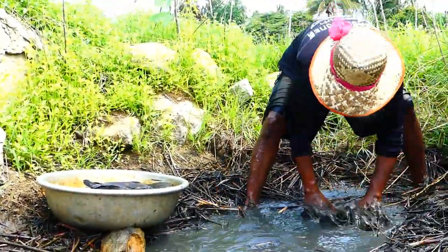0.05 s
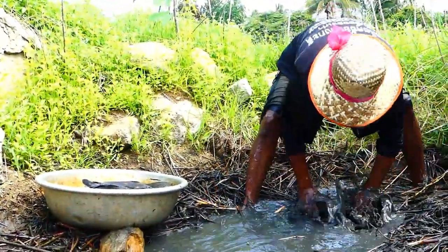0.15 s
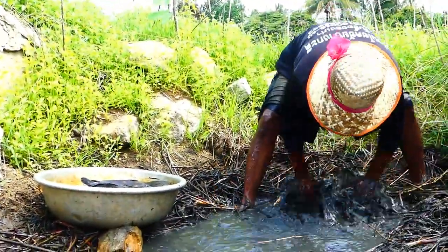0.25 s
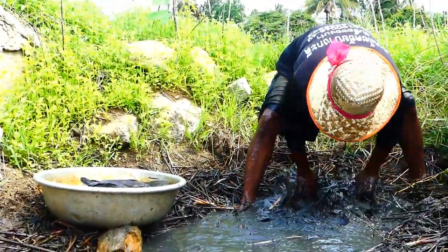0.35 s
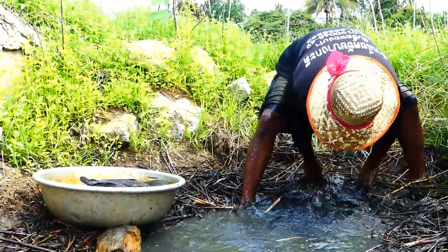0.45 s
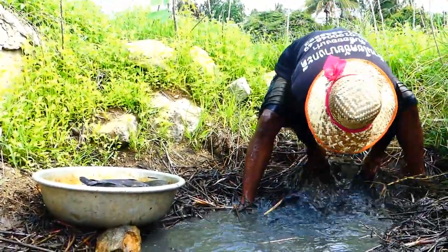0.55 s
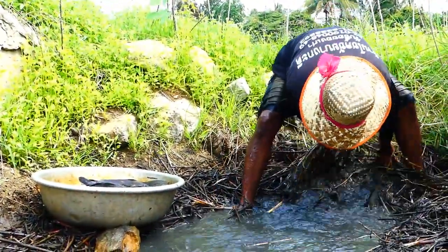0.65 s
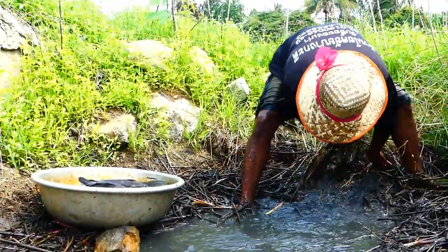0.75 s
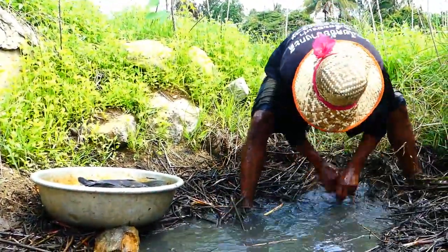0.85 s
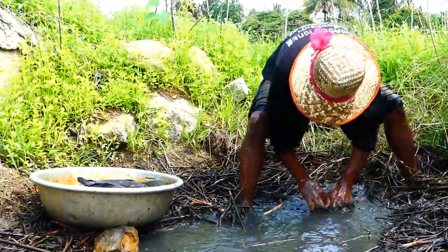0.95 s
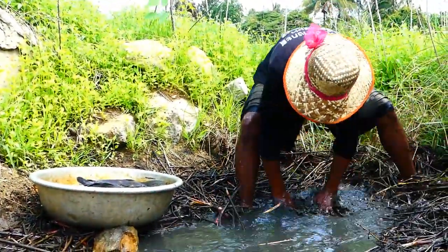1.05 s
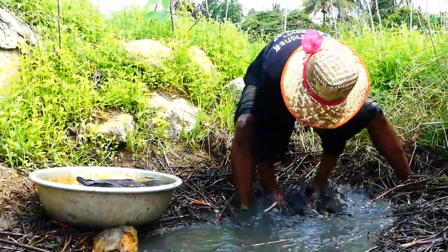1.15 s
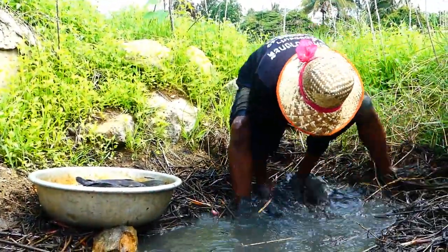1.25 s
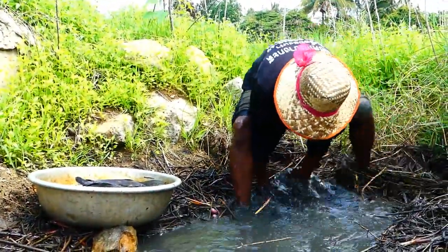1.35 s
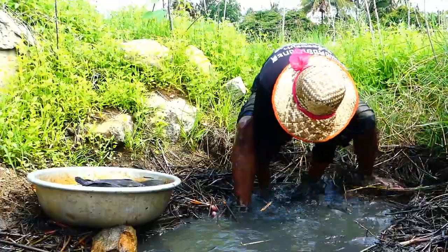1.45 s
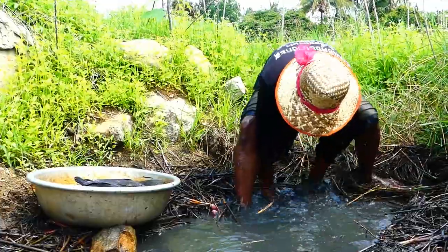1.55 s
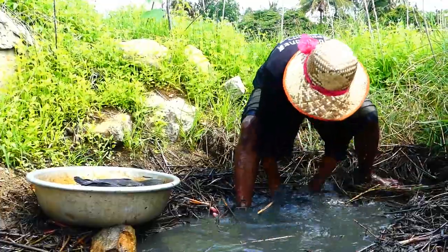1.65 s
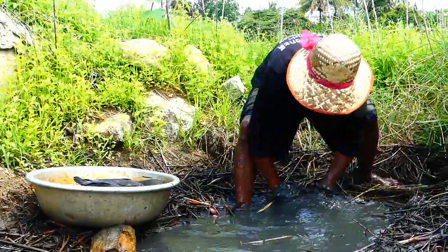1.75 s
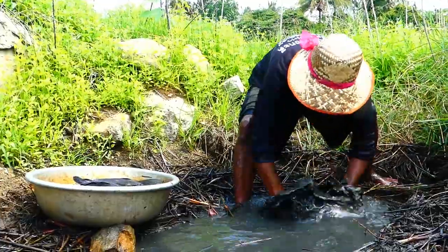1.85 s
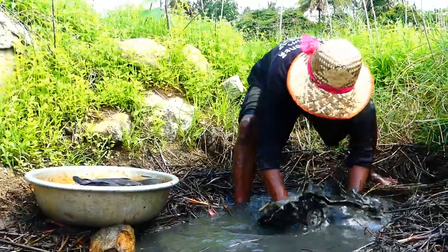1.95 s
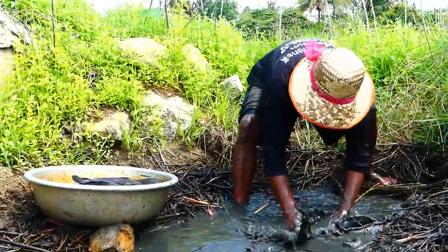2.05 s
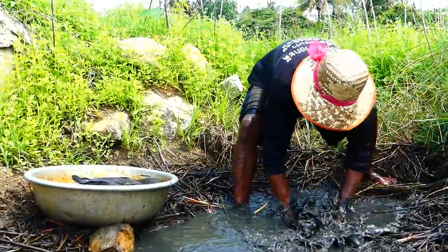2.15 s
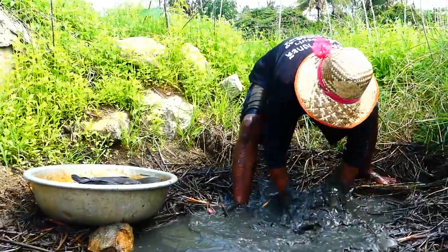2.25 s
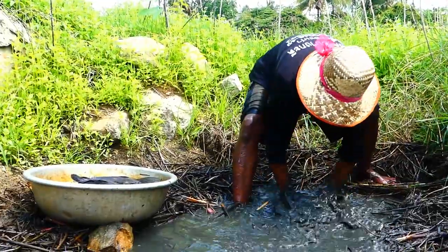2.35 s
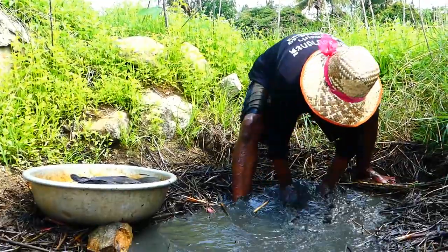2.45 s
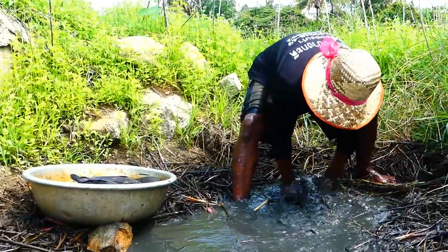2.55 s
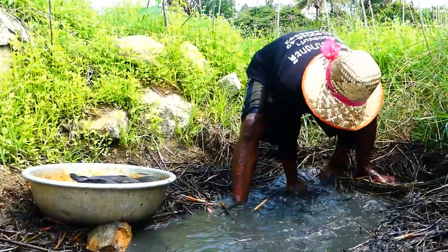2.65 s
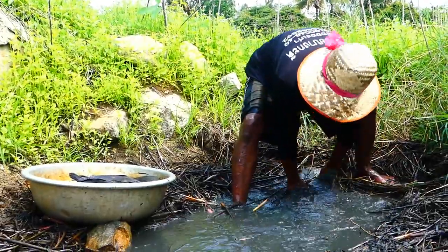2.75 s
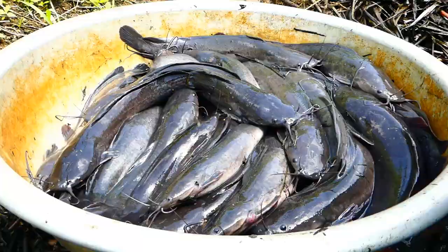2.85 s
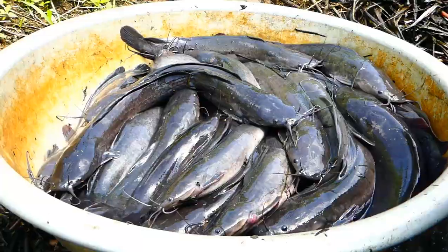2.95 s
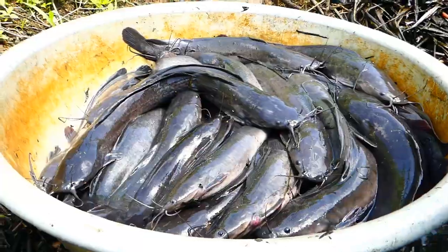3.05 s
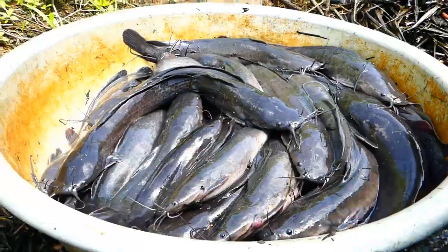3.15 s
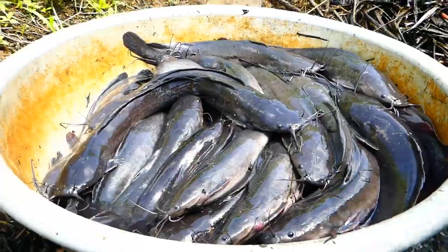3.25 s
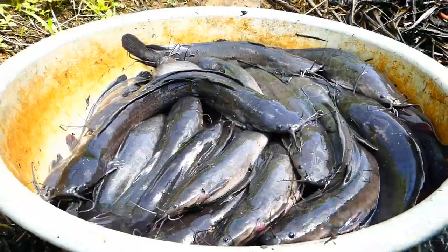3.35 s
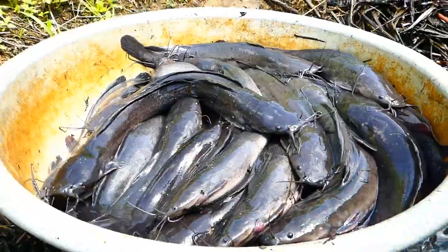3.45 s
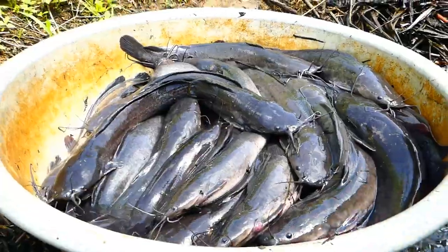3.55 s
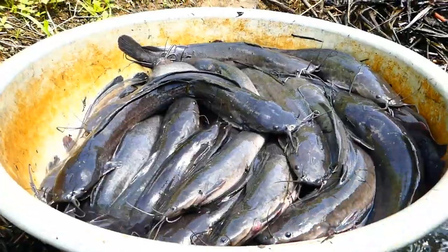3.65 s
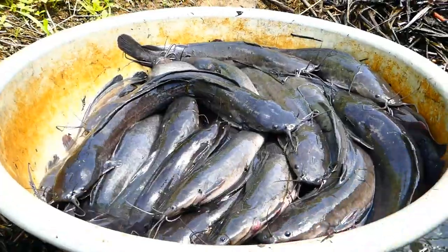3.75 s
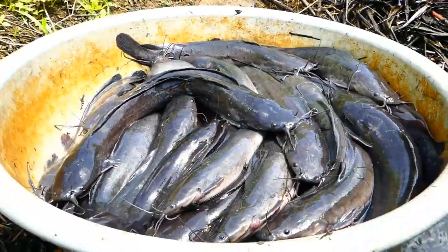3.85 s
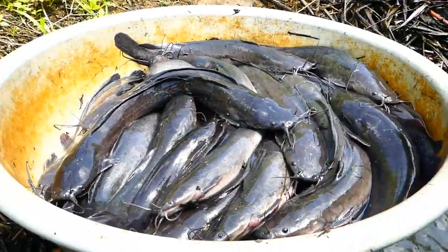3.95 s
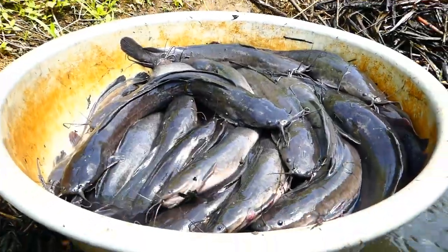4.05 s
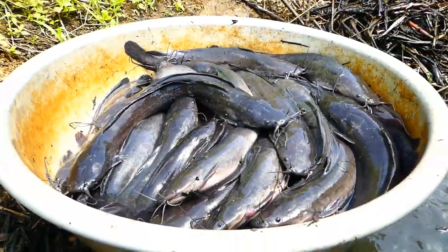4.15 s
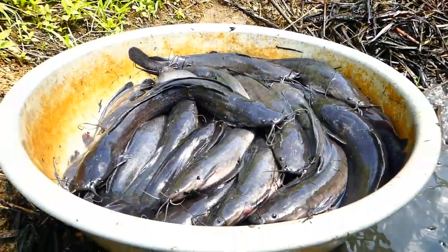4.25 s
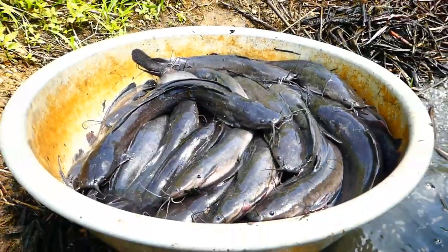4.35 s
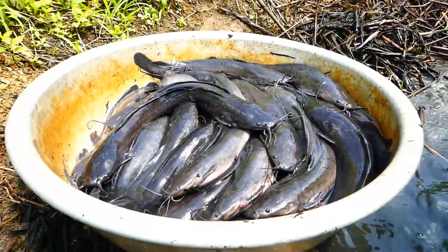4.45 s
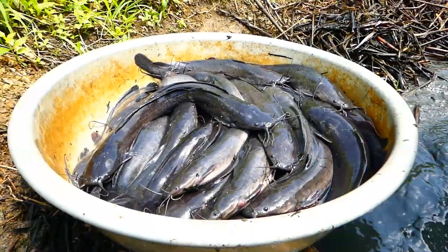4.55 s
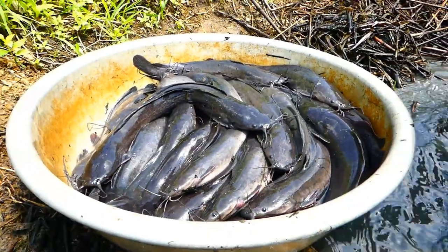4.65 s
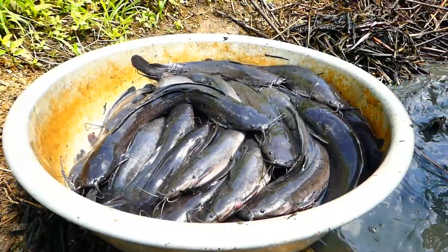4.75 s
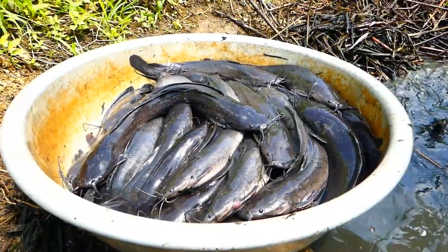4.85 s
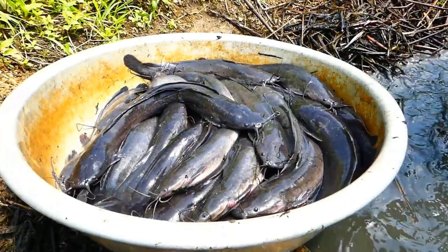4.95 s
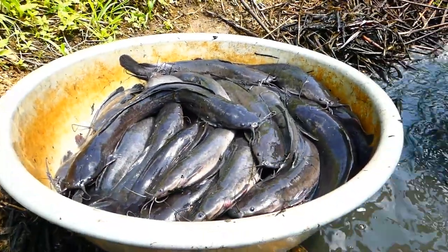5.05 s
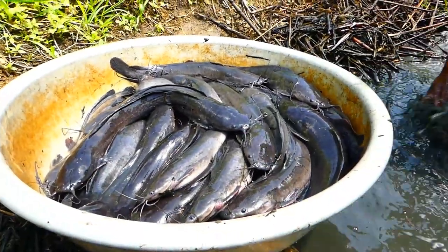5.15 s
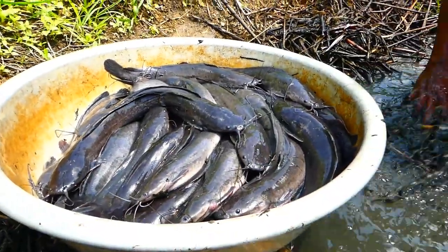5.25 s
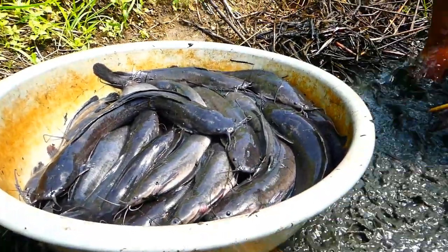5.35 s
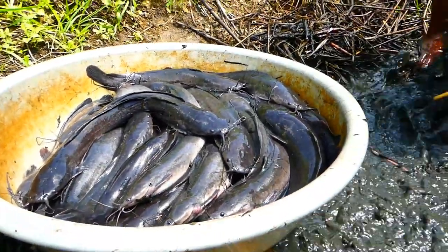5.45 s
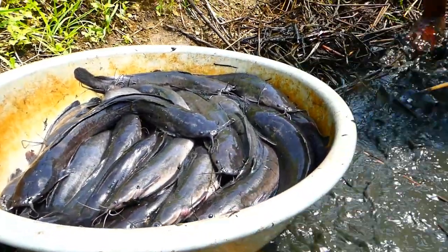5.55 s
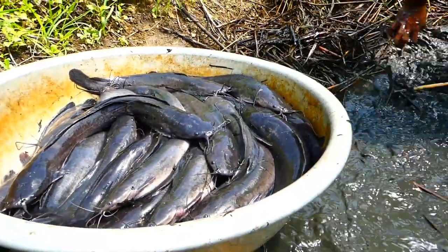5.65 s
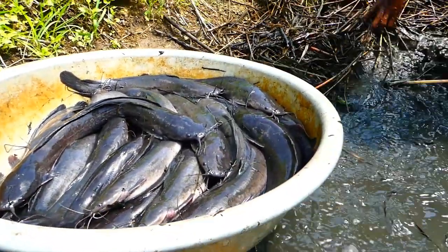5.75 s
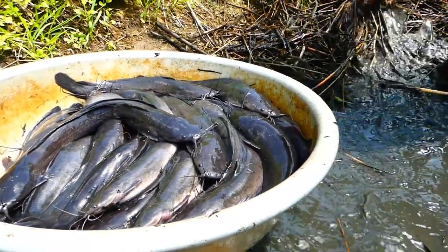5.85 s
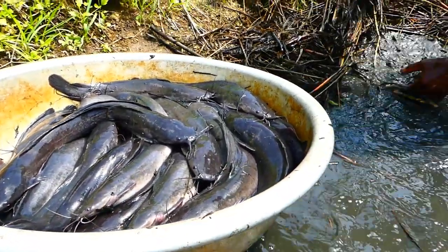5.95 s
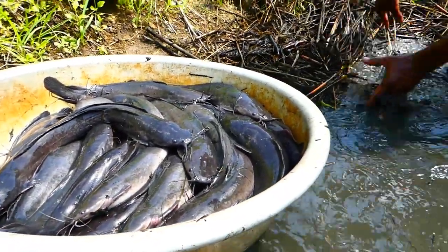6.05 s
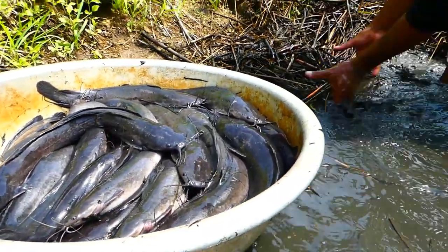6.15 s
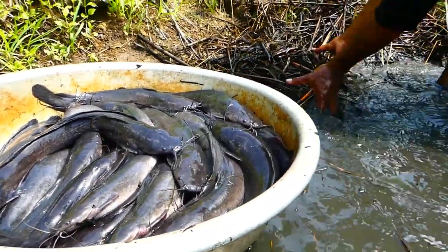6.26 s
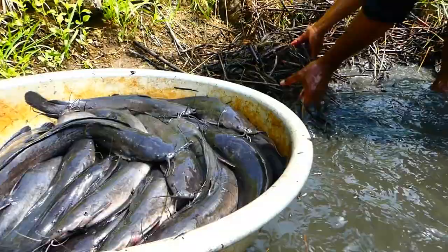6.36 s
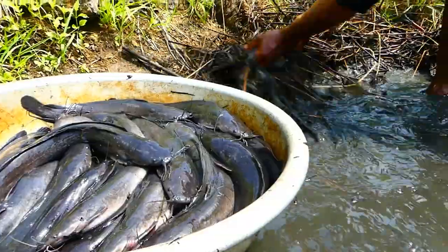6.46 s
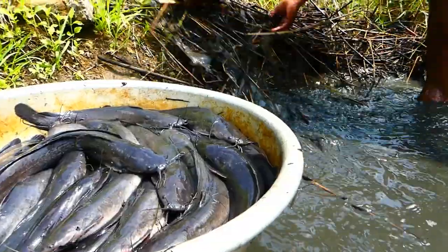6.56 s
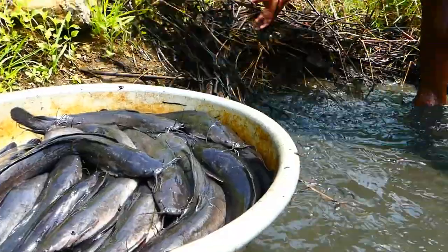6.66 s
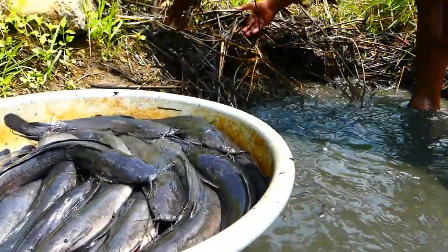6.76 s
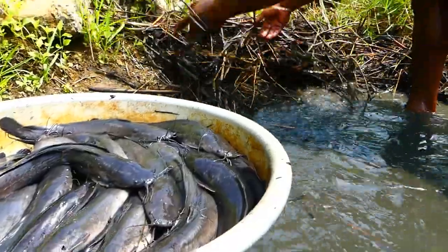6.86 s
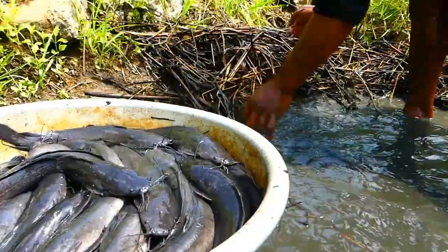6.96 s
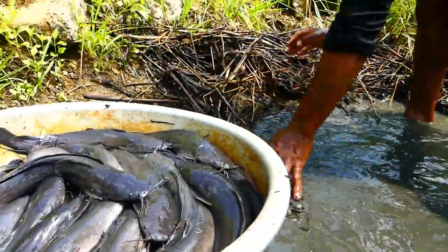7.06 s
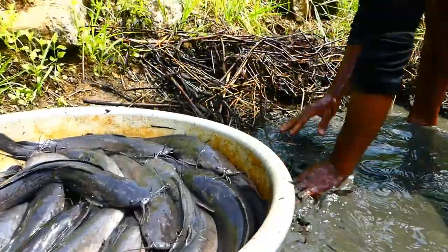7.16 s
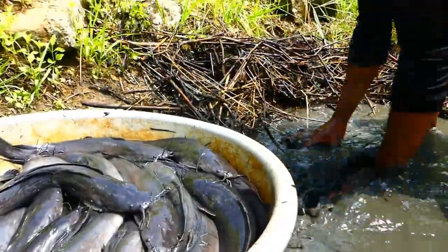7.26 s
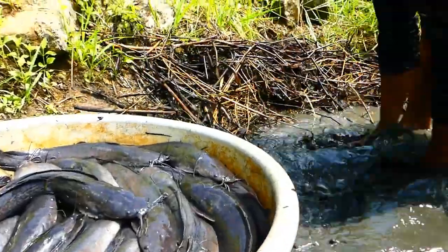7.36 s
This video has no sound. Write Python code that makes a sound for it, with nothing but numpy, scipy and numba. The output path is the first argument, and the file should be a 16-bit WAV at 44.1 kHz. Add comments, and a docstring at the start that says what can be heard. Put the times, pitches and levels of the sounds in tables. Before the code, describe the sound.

Hands dig and sweep through shallow muddy water outdoors in uneven sloshing rushes, with plops, spatter, twig snaps and one brief silent gap.

```python
"""Muddy water laps faintly, then hands dig and sweep through a shallow pond outdoors, in uneven rushes.
Torn water traps air in cavities of every size, each a sine that rings and dies; filtered noise is the froth.
Clods slap back in as clusters of cavities, drops spatter and plink, and twigs snap as damped bright tones.
The sound cuts out for a moment and fades back in from a second spot, with the water more to the right."""
import sys
import numpy as np
from scipy import signal
from scipy.fft import rfft, irfft, next_fast_len
from scipy.io import wavfile
from scipy.ndimage import uniform_filter1d
from numba import njit

SR = 44100
rng = np.random.default_rng(int(sys.argv[2]) if len(sys.argv) > 2 else 0)


def transcribe(signal):
    """Save signal, clipped to [-1, 1], as a 16-bit WAV file at the path in sys.argv[1]."""
    frames = np.atleast_2d(signal).T
    limited = np.clip(frames, -1, 1)
    pcm = np.round(limited * 32767).astype(np.int16)
    wavfile.write(sys.argv[1], SR, pcm)


N = 325899
TIME = np.arange(N) / SR   # seconds

# when the sound cuts out, returns, loses its smooth wash and is fully back
CUT_S, RESUME_S, SMOOTH_UNTIL_S, FADED_IN_S = 2.937, 3.188, 3.35, 3.6
CUTOFF_HZ = 15600
SWARM_RISE = 0.13   # share by which the pitch of most bubbles climbs as they ring


def from_db(db):
    """Decibels to gain."""
    return 10 ** (np.asarray(db) / 20)


def rms_one(x):
    """Scale to unit power."""
    return x / np.sqrt(np.mean(x ** 2) + 1e-20)


def in_time(rows):
    """Each column of a curve, sample by sample."""
    s, *columns = np.transpose(rows)
    return [np.interp(TIME, s, column) for column in columns]


def coloured(x, points):
    """Filter by a spectrum of (Hz, dB) points."""
    size = next_fast_len(N + 4096)
    hz, db = np.transpose(points)
    bins_hz = np.maximum(np.arange(size // 2 + 1) * SR / size, 1)
    gain = from_db(np.interp(np.log(bins_hz), np.log(hz), db))
    return irfft(rfft(x, size) * gain, size)[..., :N]


def band(x, low_hz, high_hz, order=2):
    """Butterworth band-pass."""
    edges_hz = [low_hz, min(high_hz, .45 * SR)]
    return signal.sosfilt(signal.butter(order, edges_hz, "band", fs=SR, output="sos"), x + 1e-18)


def add(track, s, sound):
    """Mix a sound into a track at time s."""
    at = max(round(s * SR), 0)
    track[at:at + len(sound)] += sound[:N - at]


@njit
def bubbles(starts, hz, heights, t60, rise, swell):
    """Each bubble is a sine that builds up over `swell` cycles, climbs in pitch and is choked by the mud."""
    out = np.zeros(N)
    for k in range(len(starts)):
        at, length, cycle = int(starts[k] * SR), int(t60[k] * SR) + 2, 0.
        for i in range(min(length, N - at)):
            age = i / length
            cycle += hz[k] / SR * (1 + rise * age)
            envelope = (1 - np.exp(-cycle / swell)) * np.exp(-np.log(1000) * age) * (1 - age * age)
            out[at + i] += heights[k] * envelope * np.sin(2 * np.pi * cycle)
    return out


# Colour of the open air. Each row: pitch in Hz, strength in dB per Hz.
AIR_COLOUR = [(25, -18.5), (90, -16.5), (250, -7.5), (1000, -17), (5000, -23), (15000, -26)]


def breeze():
    """Quiet open air is coloured noise, with one soft puff of wind on the microphone."""
    air = from_db(-46.5) * rms_one(coloured(rng.standard_normal((2, N)), AIR_COLOUR))
    puff = from_db(-41.5) * rms_one(band(rng.standard_normal((2, N)), 53, 176))
    puff_shape = np.exp(-((TIME - 2.905) / 0.034) ** 2)
    fade = np.interp(TIME, [CUT_S, RESUME_S, FADED_IN_S], [1, .2, 1]) ** 2
    return puff * puff_shape + air * fade


ATTACK_S, SAG_DB_PER_S, RELEASE_DB_PER_S = 0.03, 3, 266   # a sweep bites, tires and falls away
WASH_DB, WASH_DB_PER_S = -14.5, 64.5   # thrown water keeps trickling back after it


def sweep(start_s, length_s):
    """Power of one movement: a quick attack, a sagging hold, a release and a faint wash."""
    age = np.maximum(TIME - start_s, 0)
    after = np.maximum(age - length_s, 0)
    held = np.minimum(age / ATTACK_S, 1) * from_db(-SAG_DB_PER_S * age)
    wash = from_db(WASH_DB)
    release = (1 - wash) * from_db(-RELEASE_DB_PER_S * after)
    trickle = wash * from_db(-WASH_DB_PER_S * after)
    return (held * (release + trickle)) ** 2


# Water lapping between the sweeps. Each row: time in seconds, level in dB.
LAPPING_CURVE = [(0, -38), (0.04, -50.5), (0.14, -55.5), (0.85, -44.5), (1, -38), (1.07, -42),
                 (1.65, -42.5), (1.81, -41.5), (2.85, -40.5), (2.94, -56.5), (3.2, -78.5), (3.3, -56),
                 (3.5, -43.5), (4.05, -42), (5.2, -36.5), (6.4, -41), (6.83, -39.5), (6.92, -45.5),
                 (7.1, -49), (7.18, -43), (7.225, -52.5), (7.28, -43)]
LAP_BRIGHT_DB, LAP_DEPTH_DB = 5.5, -16.5   # brightness, and big cavities against the level
# Sweeps of a hand through the water. Each row: start in seconds, length in seconds, level in dB,
# brightness in dB, big cavities against the level in dB.
HAND_SWEEPS = [(0.147, 0.086, -31.5, 5.5, -14.5), (0.258, 0.24, -27, -1, -15),
               (0.504, 0.13, -28.5, 1, -17.5), (0.622, 0.2, -35, -1, -7), (1.129, 0.064, -27, -2.5, -41.5),
               (1.225, 0.11, -31.5, -2.5, -38), (1.311, .14, -29.5, -0.5, -9.5),
               (1.447, 0.073, -25, 0.5, -19.5), (1.735, 0.025, -38.5, 5, -26),
               (1.83, 0.038, -35.5, -1, -29), (1.861, 0.023, -30.5, -6, -20.5),
               (1.947, .12, -36.5, -4, -8.5), (2.051, .11, -28.5, -1.5, 0.5), (2.176, 0.073, -25, -1, -33),
               (2.264, 0.11, -31, -4.5, -9), (2.387, .08, -28.5, 0, -7.5), (2.479, 0.1, -33, -1, -17),
               (2.617, 0.14, -33, -4.5, -21.5), (2.795, 0.065, -38, 0.5, -21), (3.328, 0.13, -42, 0, -7),
               (3.487, 0.056, -36, 4.5, -25.5), (3.548, .13, -35, 0, -13.5), (3.676, 0.16, -31, -1, -33.5),
               (3.85, 0.16, -36.5, -3.5, -12), (4.081, 0.2, -29.5, 0, -10),
               (4.265, .06, -32.5, -0.5, -29.5), (4.321, 0.038, -27.5, 2.5, -1),
               (4.376, 0.11, -29, 1, -18.5), (4.491, 0.12, -30, -1.5, -12), (4.627, 0.16, -25.5, 0.5, -7),
               (4.789, .11, -29, 0, -5.5), (4.907, 0.05, -26, 0, -6), (4.981, 0.14, -30.5, -3.5, -13.5),
               (5.104, 0.16, -25.5, 4, -13), (5.289, 0.17, -29, 2.5, -20.5), (5.465, .2, -29.5, 0.5, -17.5),
               (5.656, 0.09, -27, -3, -16), (5.733, 0.13, -26.5, 0.5, -21), (5.885, 0.19, -31, 1, -16),
               (6.079, .09, -32, 8, -37), (6.28, 0.18, -43, -3.5, -31), (6.322, 0.031, -30.5, 4, -31),
               (6.513, 0.18, -29, 3, -29), (7.279, 0.083, -42.5, 1.5, -18.5), (7.329, .077, -31, 1, -10.5)]
GURGLE_DB, SPLATTER_DB, SPRAY_DB = -1.3, -0.78, -7   # size classes against the level, at brightness 0


def stirring():
    """Level in dB of each size class: lapping plus all sweeps; a bright sweep trades gurgle for spray."""
    def classes(bright_db, depth_db):
        """Relative power of slosh, gurgle, splatter and spray."""
        return from_db([[depth_db], [GURGLE_DB - bright_db], [SPLATTER_DB], [SPRAY_DB + bright_db]]) ** 2

    lapping_db, = in_time(LAPPING_CURVE)
    power = from_db(lapping_db) ** 2 * classes(LAP_BRIGHT_DB, LAP_DEPTH_DB)
    for start_s, length_s, db, bright_db, depth_db in HAND_SWEEPS:
        power += from_db(db) ** 2 * classes(bright_db, depth_db) * sweep(start_s, length_s)
    return 10 * np.log10(power)


SURGE_DB = -52.5   # rumble at the hardest stirring


def surge():
    """The shifted water is low noise that rumbles faintly, rising and falling with the stirring."""
    _, gurgle_db, _, _ = stirring()
    fade = np.interp(TIME, [CUT_S, RESUME_S, FADED_IN_S], [1, 0, 1]) ** 2
    rumble = rms_one(band(rng.standard_normal((2, N)), 60, 330))
    return fade * rumble * from_db(SURGE_DB + (gurgle_db - gurgle_db.max()) / 2)


def clumps(per_s, fade_s):
    """Sheets of water tear at random moments, suddenly, and settle; mean 0, spread 1."""
    tears = (rng.random(N) < per_s / SR) * rng.uniform(0.68, 1, N)
    settling = np.sqrt(signal.lfilter([1], [1, -np.exp(-1 / (fade_s * SR))], tears + 1e-18))
    return rms_one(settling - settling.mean())


# Colour of the water at the first and second spot. Each row: pitch in Hz, strength in dB per Hz.
FIRST_SPOT_COLOUR = [(41, -71.5), (70, -40.5), (318, -8.5), (408, -20), (511, -5.5), (701, 1.5), (822, -7),
                     (1130, 0), (2380, -7), (2600, -6.5), (4000, -16.5), (5480, -21), (9640, -28.5),
                     (15500, -37.5)]
SECOND_SPOT_COLOUR = [(41, -59), (70, -41.5), (189, -21.5), (318, -10), (399, -5.5), (457, 4), (768, 7.5),
                      (920, 4.5), (1050, 8.5), (1410, 7.5), (1940, 8.5), (5240, 0), (10100, -10),
                      (15500, -19)]
FROTH_FOLLOWS = 0.78   # how fast the froth thins out as the water calms


def swarm(level_db, low_hz, high_hz, per_s, cycles, spread_db, froth_db, clump_db):
    """Mid and side of one size class of grains, bursting in clumps over a froth too fine to resolve."""
    draws = rng.random((40000, 7))[:int(per_s * N / SR)]
    # calmer water sheds fewer bubbles, so that single drips stand out
    busy = from_db(.4 * (level_db - level_db.max()))
    kept = draws[:, -1] < busy[(draws[:, 0] * N).astype(int)]
    when, pitch, size, damping, sign, place, _ = draws[kept].T
    hz = low_hz * (high_hz / low_hz) ** pitch
    loudness = from_db(spread_db * np.minimum(-np.log(1 - size), 3.5))
    heights = loudness * np.sign(sign - .5) * hz / low_hz
    sideways = np.sqrt(2) * np.cos(np.pi * place)
    t60 = cycles / hz * 2 ** (2 * damping - 1)
    single = np.array([bubbles(when * N / SR, hz, h, t60, SWARM_RISE, 0.2)
                       for h in (heights, heights * sideways)])
    # the sound fades back in as a smooth wash before single grains emerge
    wash = np.interp(TIME, [CUT_S, RESUME_S, SMOOTH_UNTIL_S], [0, 2, 0]) ** 2
    froth = band(rng.standard_normal((2, N)), low_hz, high_hz, order=4) * (busy ** FROTH_FOLLOWS + wash)
    water = rms_one(single) + from_db(froth_db) * rms_one(froth)
    water = water * from_db(clump_db * clumps(per_s=50, fade_s=0.016))
    # at the first spot a close echo off the bank hollows out the tone
    echo = np.roll(water, round(0.001847 * SR), axis=1) * 0.26 / (1 + low_hz / 4000)
    first_spot = rms_one(coloured(water + echo, FIRST_SPOT_COLOUR))
    second_spot = rms_one(coloured(water, SECOND_SPOT_COLOUR))
    water = np.where(TIME < CUT_S, first_spot, second_spot)
    # evened out over a twentieth of a second, the grain follows the stirring
    return from_db(level_db) * water / np.sqrt(uniform_filter1d(water[0] ** 2, size=2200) + 1e-9)


# Wet stems dragged at the bank. Each row: start in seconds, length in seconds, level in dB.
STEM_DRAGS = [(5.164, 0.92, -41), (6.56, 0.15, -39.5), (6.72, 0.25, -44.5), (7.275, 0.035, -37.5)]


def rustle():
    """Wet stems rub together in a fine, bright crackle of tiny grains."""
    power = sum(from_db(db) ** 2 * sweep(start_s, length_s) for start_s, length_s, db in STEM_DRAGS)
    return swarm(10 * np.log10(power + 1e-12), 8300, 15000, per_s=3000, cycles=24,
                 spread_db=2.5, froth_db=3, clump_db=1)


def grains(per_s, low_hz, high_hz, level_db, spread_db, cycles):
    """Stray single grains, more frequent and louder while more water is being thrown."""
    when, pitch, size, chance = rng.random((1000, 4))[:int(per_s * N / SR)].T
    _, _, splatter_db, _ = stirring()
    thrown_db = splatter_db[(when * N).astype(int)]
    falls = chance < from_db(thrown_db - splatter_db.max() + 6)
    hz = low_hz * (high_hz / low_hz) ** pitch
    db = thrown_db + level_db + spread_db * np.minimum(-np.log(1 - size), 2)
    return bubbles(when * N / SR, hz, from_db(db) * falls, cycles / hz, SWARM_RISE, 0.8)


def drips():
    """Stray drops fall back and plink; thin films burst with a wet tick."""
    # per_s counts candidates, thinned out in calm water; level is against the splatter
    plinks = grains(per_s=23, low_hz=1190, high_hz=5130, level_db=1, spread_db=-4.5, cycles=70)
    ticks = grains(per_s=70, low_hz=1470, high_hz=6200, level_db=8.5, spread_db=0.5, cycles=14)
    return plinks + ticks


SPATTER_SPREAD_OCT, SPATTER_CYCLES = 0.505, 17   # range of the drops' pitches and how long each rings


def burst(s, length_s, db, middle_hz, count=60):
    """A handful of drops lands as a tight burst of tiny, quickly choked bubbles."""
    when, size = rng.random((2, count))
    hz = np.minimum(middle_hz * 2 ** (SPATTER_SPREAD_OCT * rng.standard_normal(count)), CUTOFF_HZ)
    drops = bubbles(s + length_s * when, hz, size - .5, SPATTER_CYCLES / hz, SWARM_RISE, 0.32)
    return drops * (from_db(db) / np.sqrt(np.sum(drops ** 2) / (length_s * SR)))


# Flung handfuls of drops landing together. Each row: start in seconds, length in seconds,
# average (rms) level in dB, middle pitch in Hz.
FLUNG_DROPS = [(0.576, 0.0081, -28, 2010), (1.077, 0.017, -33.5, 6600), (1.125, 0.015, -25.5, 4250),
               (1.823, 0.0058, -35.5, 5240), (2.241, 0.012, -28, 4700), (2.325, .012, -31.5, 4500),
               (3.621, 0.0078, -30, 3620), (3.665, 0.0065, -29.5, 3970), (2.546, 0.0096, -25, 2720),
               (3.799, 0.0074, -24.5, 3300), (4.469, .006, -34, 4940), (4.439, .007, -24.5, 1880),
               (4.558, 0.0084, -24, 3370), (5.223, 0.019, -26, 2640), (5.742, .024, -26.5, 2620),
               (5.816, 0.024, -24.5, 2740), (5.914, 0.015, -24.5, 1830), (3.841, 0.0049, -31, 4300),
               (6.094, 0.017, -22.5, 2600), (6.151, 0.032, -27, 2680), (6.834, 0.017, -35.5, 3250),
               (7.201, 0.012, -33, 3470)]


def spatters():
    """Flung water comes down, handful by handful, each a burst of bubbles."""
    return sum(burst(*row) for row in FLUNG_DROPS)


# What a snap rings with. Each row: pitch in Hz, strength in dB against the other tones.
TWIG_MODES = [(2000, -11.5), (2800, 8), (3250, 13), (4450, 10.5), (5300, 13.5), (11500, -1.5)]
# Twigs and sharp spatters. Each row: start in seconds, peak level in dB, time to fall by 60 dB in seconds.
TWIG_SNAPS = [(1.344, -18, 0.03), (1.51, -15.5, 0.045), (4.384, -16, 0.01), (4.9426, -10.5, 0.018),
              (4.998, -12.5, 0.02), (5.4056, -9.5, 0.011), (5.763, -10, 0.028), (6.113, -9.5, 0.024),
              (6.32, -16, 0.018), (6.798, -3.5, 0.019), (7.154, -19.5, 0.031), (7.159, -14.5, 0.0078),
              (7.3023, -13.5, 0.047)]


def snaps():
    """A sharp crack of noise sets a few bright, heavily damped modes ringing."""
    out, t = np.zeros(N), TIME[:SR // 12]
    hz, mode_db = np.transpose(TWIG_MODES)
    for s, db, t60 in TWIG_SNAPS:
        pitches = hz * (1 + 0.0093 * rng.standard_normal(len(hz)))
        ring = from_db(mode_db) @ np.sin(2 * np.pi * pitches[:, None] * t)
        crack = from_db(16.5) * rms_one(band(rng.standard_normal(len(t)), 1800, 8700))
        snap = (ring + crack) * from_db(-60 * t / t60)
        add(out, s, from_db(db) * snap / np.abs(snap).max())
    return out


# Air pockets dragged behind a hand. Each row: start in seconds, length in seconds, first pitch in Hz,
# last pitch in Hz, level in dB.
AIR_POCKETS = [(0.168, .05, 2860, 2290, -26), (0.351, 0.25, 528, 510, -22),
               (0.309, 0.22, 1047, 1155, -21.5), (1.182, 0.16, 670, 616, -21),
               (1.455, 0.036, 655, 675, -18), (1.952, 0.1, 500, 630, -21.5), (2.409, .06, 634, 700, -22.5),
               (3.69, 0.14, 840, 870, -23), (3.93, 0.053, 780, 920, -26), (4.118, 0.17, 702, 758, -21),
               (4.321, 0.129, 757, 840, -18.5), (4.506, 0.069, 334, 316, -24), (4.76, 0.1, 570, 760, -24),
               (4.912, 0.068, 670, 540, -18.5), (5.053, 0.072, 620, 733, -19),
               (6.274, 0.094, 1690, 1214, -26)]
POCKET_PER_S, POCKET_T60_S, POCKET_SPREAD_OCT = 85, 0.044, 0.087   # bubbles pinched off behind the hand


def pockets():
    """An air pocket breaks into a chain of bubbles whose pitch glides as the pocket shrinks or grows."""
    chains = []
    for start_s, length_s, first_hz, last_hz, db in AIR_POCKETS:
        jitter, pitch, size = rng.uniform(-1, 1, (3, 80))
        age = (np.arange(len(jitter)) + (1 + jitter) / 3) / POCKET_PER_S
        glide_hz = np.interp(age, [0, length_s], [first_hz, last_hz])
        hz = glide_hz * 2 ** (POCKET_SPREAD_OCT * pitch)
        chain = np.array([start_s + age, hz, from_db(db) * (1 + size / 2)])
        chains.append(chain[:, age < length_s])
    s, hz, heights = np.hstack(chains).copy()
    return bubbles(s, hz, heights, np.full(len(s), POCKET_T60_S), SWARM_RISE, 0.72)


# Single loud bubbles and drops. Each row: start in seconds, pitch in Hz, level in dB,
# time to fall by 60 dB in seconds.
LOUD_BUBBLES = [(0.061, 1750, -32, 0.034), (0.213, 2000, -10.5, 0.012), (.25, 1780, -10, 0.036),
                (.286, 582, -17, 0.15), (0.895, 1820, -24.5, 0.031), (1.151, 678, -6, 0.041),
                (1.223, 1730, -15, 0.022), (1.345, 1730, -11.5, 0.061), (1.319, 507, -11, 0.045),
                (1.356, 515, -5.5, 0.043), (1.49, 1110, -10.5, 0.044), (1.514, 1146, -2, 0.021),
                (1.514, 1840, -11.5, 0.026), (1.625, 1180, -17, 0.015), (1.759, 2280, -22.5, 0.019),
                (1.888, 725, -9, 0.035), (2.027, 1900, -19, 0.063), (2.295, 580, -8, 0.023),
                (2.419, 560, -7.5, 0.02), (2.483, 1070, -14.5, 0.04), (2.649, 2550, -15.5, .031),
                (3.355, 440, -27.5, 0.047), (3.404, 826, -27, 0.099), (3.419, 1490, -24.5, 0.054),
                (3.477, 2260, -24, 0.042), (3.603, 3170, -19, 0.028), (3.728, 1330, -12, 0.025),
                (3.875, 1970, -14, 0.031), (3.974, 954, -13.5, 0.02), (3.985, 1590, -17, 0.028),
                (4.044, 1210, -10.5, 0.019), (4.14, 443, -16, 0.11), (4.354, 730, -15, 0.025),
                (4.524, 560, -9.5, 0.062), (4.632, 2730, -11, 0.021), (4.642, 520, -10, 0.035),
                (4.772, 1570, -12.5, 0.027), (4.848, 740, -8, 0.022), (4.944, 1980, -8.5, 0.013),
                (4.966, 600, -4.5, 0.016), (5.294, 2210, -16, 0.032), (5.463, 1800, -3, 0.011),
                (5.5, 1046, -17, 0.084), (5.707, 743, -11.5, 0.042), (5.85, 1045, -14, 0.081),
                (6.063, 487, -9.5, 0.052), (6.245, 1135, -23.5, 0.042), (6.277, 1820, -25, .04),
                (6.293, 1165, -24, 0.045), (6.32, 4500, -17, 0.016), (6.336, 1330, -11, 0.033),
                (6.408, 1540, -18, 0.029), (6.425, 1310, -23.5, 0.067), (6.547, 1110, -9.5, 0.029),
                (6.56, 1030, -11, 0.076), (6.59, 257, -27, 0.094), (6.951, 1710, -24, 0.0096),
                (7.24, 2480, -23, 0.033), (7.295, 804, -23, 0.045), (7.332, 970, -22, 0.028)]
# Deep pockets of air gulping shut under heavy mud. Each row: the same columns as the loud bubbles.
DEEP_GULPS = [(1.424, 330, -15, 0.042), (1.513, 280, -6, 0.026), (2.077, 101, -19, 0.084),
              (2.092, 204, -6.5, 0.031), (2.112, 186, -3, 0.042), (2.137, 138, -17, 0.094),
              (2.168, 255, -14, 0.033), (2.182, 333, -8, 0.037), (2.355, 239, -13, 0.044),
              (4.805, 358, -22, .05), (4.965, 350, -13, 0.037)]


def plops(rows, rise, swell):
    """Large single bubbles ring out above the swarm, climbing in pitch."""
    s, hz, db, t60 = np.array(rows, float).T.copy()
    return bubbles(s, hz * (1 - rise / 8), from_db(db), t60, rise, swell)


SHARD_DB, SHARD_S, SHARD_SPREAD_OCT = -11.5, .009, 0.49   # against the loud bubble; within this time; pitch


def shards(count=4):
    """A loud bubble sheds a few small ones of nearby pitch, which roughen its note."""
    s, hz, db, t60 = np.repeat(np.array(LOUD_BUBBLES, float), count, axis=0).T
    hz = hz * 2 ** (SHARD_SPREAD_OCT * rng.uniform(-0.45, 1, len(s)))
    return bubbles(s + SHARD_S * rng.random(len(s)), hz, from_db(db + SHARD_DB), t60 / 2, SWARM_RISE, .5)


# Hands and clods hitting the water. Each row: start in seconds, level in dB that the parts are set
# against, cavity pitch in Hz, time to fall by 60 dB in seconds at that pitch.
WATER_SLAPS = [(0.229, -8, 990, 0.071), (0.571, -14.5, 1255, 0.066), (0.632, -13, 730, 0.042),
               (1.345, -13, 700, 0.017), (1.5128, -5.5, 610, 0.025), (1.756, -18, 593, 0.052),
               (1.877, -12.5, 786, 0.046), (2.325, -8, 540, 0.11), (2.745, -13, 593, 0.042),
               (3.624, -12.5, 473, 0.029), (3.689, -17, 858, 0.072), (3.766, -7.5, 847, 0.048),
               (4.107, -6, 696, 0.056), (4.438, -18, 504, 0.18), (4.589, -8.5, 694, 0.018),
               (4.685, -10, 1140, 0.028), (5.398, -3, 863, 0.046), (5.516, -7, 957, 0.028),
               (5.56, -14.5, 722, 0.11), (5.655, -11, 556, 0.071), (7.36, -7.5, 1100, 0.017)]
# What a slap opens, a main cavity and smaller or larger ones. Each row: multiple of the slap's pitch,
# level against the slap in dB, delay in seconds; all but the main one stray at random in pitch and delay.
SLAP_CAVITIES = [(1, -8, 0), (.64, -15, .0012), (1.43, -9, .0004), (2.1, -12, 0), (3.2, -16, .0006),
                 (1.2, -13, .004)]
CAVITY_SPREAD_OCT = 0.15   # no two blows open the same cavities
SLAP_SPLASH_DB, SLAP_SPLASH_S = -24.5, .018   # drops that a slap throws, against its level


def slaps():
    """A blow on the surface throws drops and opens a cluster of cavities; small ones die first."""
    s, db, hz, t60 = np.array(WATER_SLAPS, float).T.copy()
    # the drops lie around an octave above the cavity
    out = sum(burst(at, SLAP_SPLASH_S, slap_db + SLAP_SPLASH_DB, 2 * cavity_hz)
              for at, slap_db, cavity_hz, _ in WATER_SLAPS)
    for ratio, cavity_db, delay in SLAP_CAVITIES:
        stray = (ratio != 1) * rng.uniform(-1.2, 1, len(s))
        starts = s + delay + delay * stray
        pitches = hz * ratio * 2 ** (CAVITY_SPREAD_OCT * stray)
        out += bubbles(starts, pitches, from_db(db + cavity_db), t60 / np.sqrt(ratio), SWARM_RISE, 0.56)
    return out


def churn():
    """Big cavities slosh, middling ones gurgle, small ones splatter and the spray crackles."""
    slosh_db, gurgle_db, splatter_db, spray_db = stirring()
    slosh = swarm(slosh_db, 122, 462, per_s=260, cycles=8.7, spread_db=3.0, froth_db=-9.5, clump_db=7.0)
    gurgle = swarm(gurgle_db, 381.8, 1414, per_s=900, cycles=55.5, spread_db=3.0, froth_db=-8.0, clump_db=1.1)
    splatter = swarm(splatter_db, 1455, 4167, per_s=900, cycles=56, spread_db=4.0, froth_db=-6, clump_db=1)
    spray = swarm(spray_db, 4147, 14750, per_s=3300, cycles=140, spread_db=4.0, froth_db=-1.5, clump_db=3.0)
    return slosh + gurgle + splatter + spray


def scattered(x, t60):
    """A dense spatter of echoes from mud and reeds, about equally strong at every pitch."""
    t = TIME[:SR // 3]
    echoes = rng.standard_normal(len(t))
    for _ in range(3):   # fade the echoes, then level their spectrum
        spectrum = rfft(echoes * from_db(-30 * t / t60))
        echoes = irfft(spectrum / (np.abs(spectrum) + 1e-12), len(t))
    echoes = echoes * (t < t60)
    return signal.fftconvolve(x, echoes / np.linalg.norm(echoes))[:N]


# Spread of the water between the ears. Each row: pitch in Hz, gain of the side signal in dB.
SIDE_WIDTH = [(80, 17.5), (250, -1.5), (600, -12.5), (1500, -8.5), (5000, -11.5), (9000, -8.5), (14000, -4)]
# Where the water lies. Each row: time in seconds, left minus right in dB.
WATER_BEARING = [(0, -.8), (2.95, -.5), (3.2, -4.2), (5.2, -4.4), (6.7, -1.5)]


def scene():
    """The water, placed between its banks, under open air."""
    mid, side = churn() + rustle()
    mid = mid + plops(LOUD_BUBBLES, rise=0.12, swell=1.0) + plops(DEEP_GULPS, rise=0.35, swell=1.0)
    mid = mid + slaps() + shards() + spatters() + snaps() + pockets() + drips()
    mid = band(mid, 40, SR / 2)
    banks = from_db(-15) * np.array([scattered(mid, t60=.06) for _ in range(2)])
    left_right = np.array([[1], [-1]])
    bearing_db, = in_time(WATER_BEARING)
    water = mid + coloured(side, SIDE_WIDTH) * left_right + banks
    return water * from_db(bearing_db * left_right / 2) + surge() + breeze()


def record(dry):
    """The sound drops out briefly; the microphone has a narrow notch and the top is cut."""
    live = (TIME < CUT_S) | (TIME > RESUME_S)
    notched = signal.lfilter(*signal.iirnotch(7530, 35, fs=SR), dry * live + 1e-18)
    return signal.sosfilt(signal.ellip(10, .1, 80, CUTOFF_HZ, fs=SR, output="sos"), notched)


dry = scene()
out = record(dry)
transcribe(out)
```